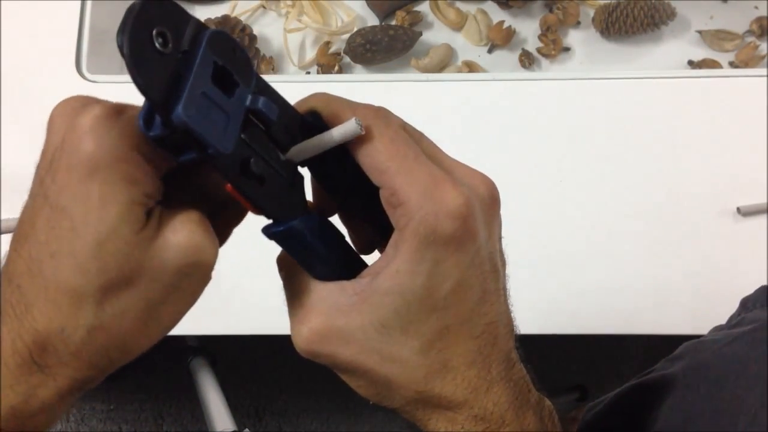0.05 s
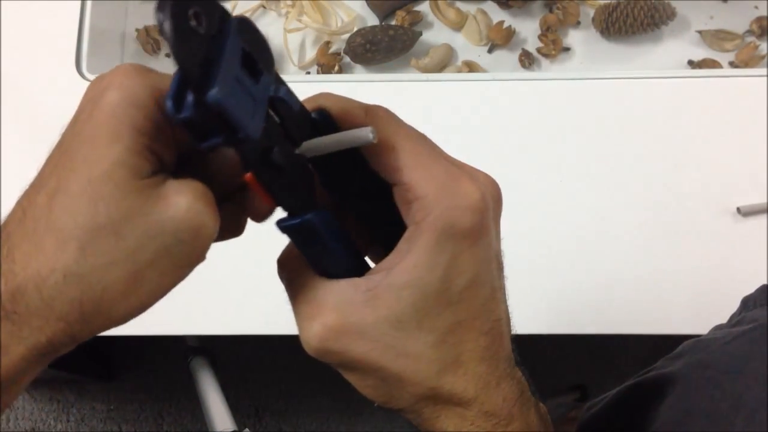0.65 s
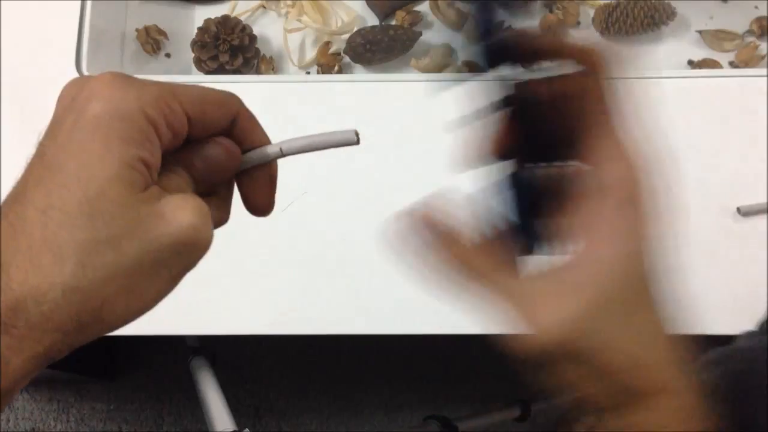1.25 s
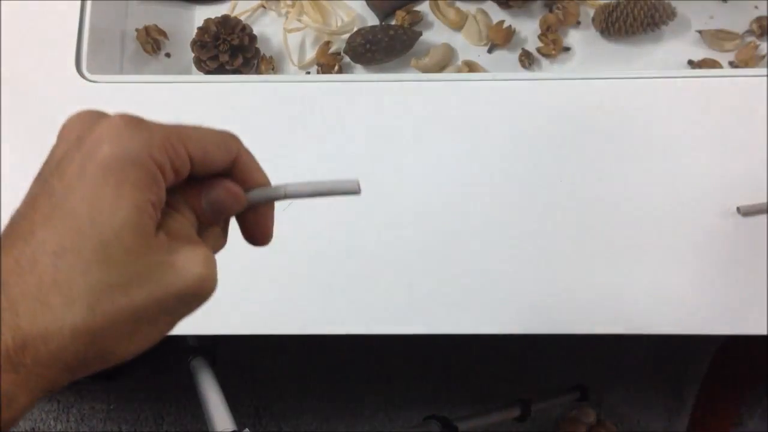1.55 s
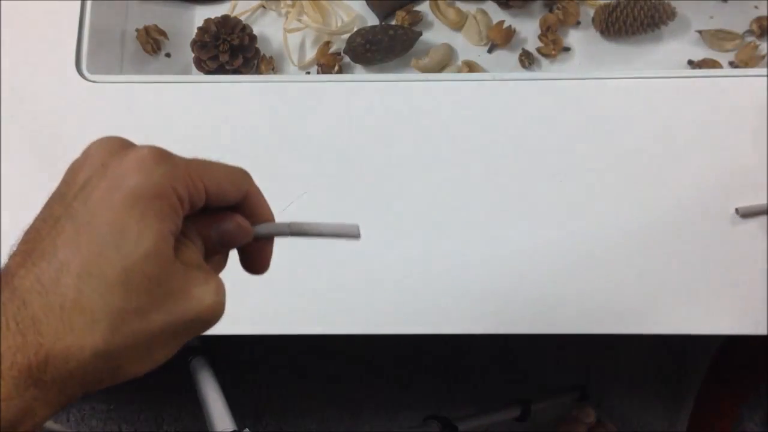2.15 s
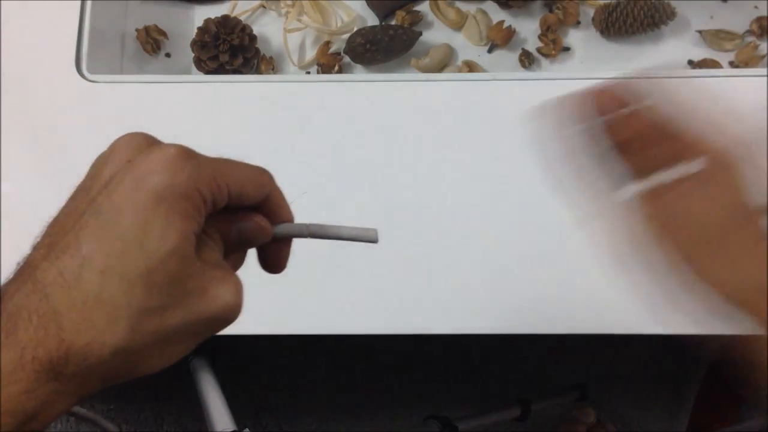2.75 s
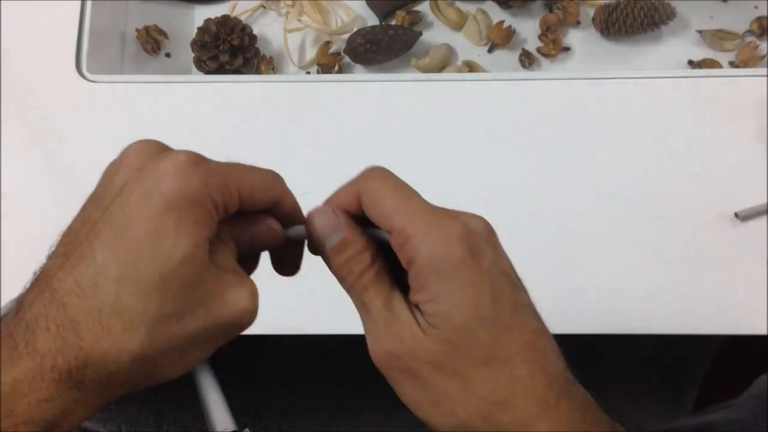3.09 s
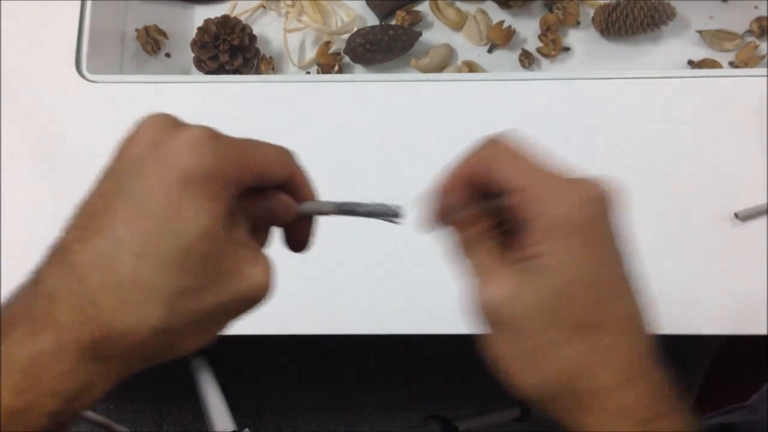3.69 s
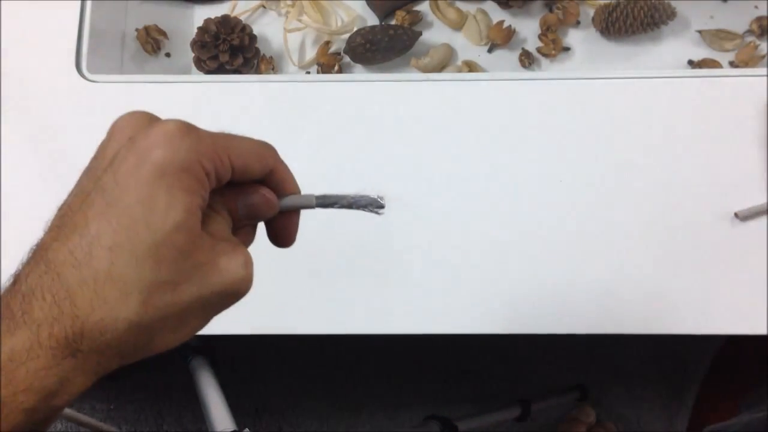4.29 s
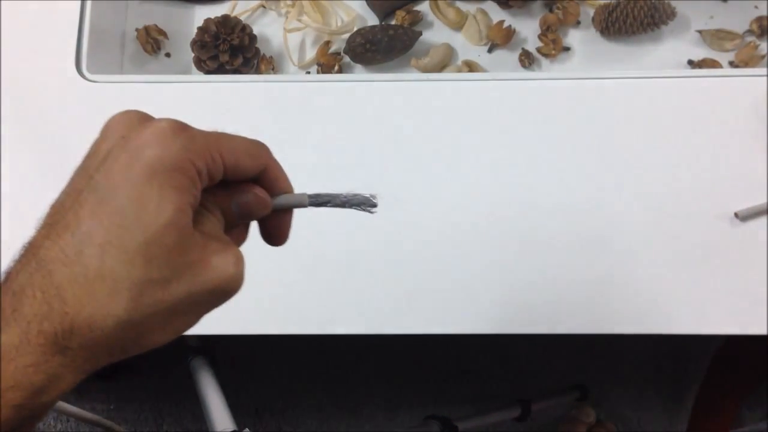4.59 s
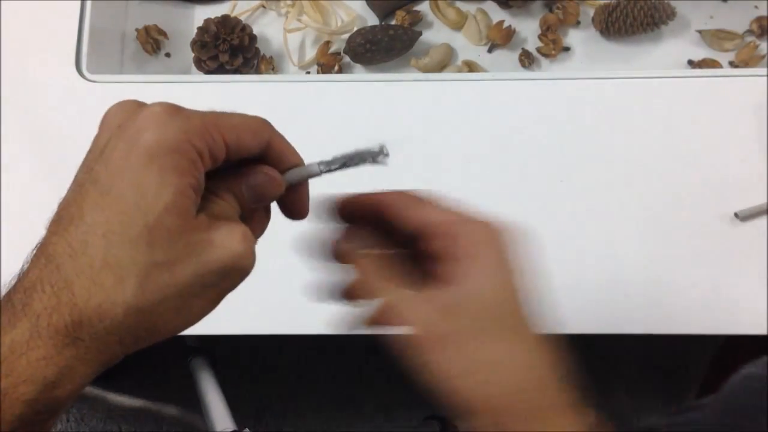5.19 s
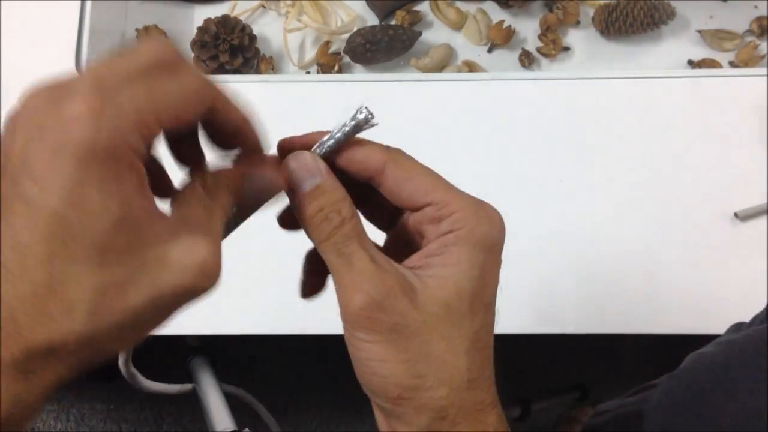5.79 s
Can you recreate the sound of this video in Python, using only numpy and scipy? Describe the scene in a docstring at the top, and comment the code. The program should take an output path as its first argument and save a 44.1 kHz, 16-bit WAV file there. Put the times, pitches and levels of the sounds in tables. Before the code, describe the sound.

Close by in a small, quiet room, a few faint handling bumps lead to a crisp click as a crimping tool nicks a cable. The loudest sound comes next: the tool knocks hard on a desk, then tips and settles with muffled thuds and a little clack. Later come a light plastic tick, the tiny bounce of a dropped piece of cable jacket and a soft tap, over faint hiss and low rumble.

```python
"""A hand crimping tool bumps softly on a desk, nicks a network cable's jacket and snaps free (1.1 s).
It is put down with one hard knock that rings the desk top (1.8 s), then rocks over and settles.
Fingers slide the jacket off with a plastic tick (3.8 s) and drop it (4.9 s); it bounces, soft taps follow.
Throughout, a small quiet room: a sleeve brushing now and then, a far clock, low rumble, hum and hiss."""
import sys
import numpy as np
from scipy import signal
from scipy.fft import rfft, irfft, next_fast_len
from scipy.io import wavfile

SR = 44100
rng = np.random.default_rng(int(sys.argv[2]) if len(sys.argv) > 2 else 0)


def store_pcm(level_fs):
    """Save levels as 16-bit WAV."""
    pcm = np.round(np.clip(level_fs, -1, 1) * 32767).astype(np.int16)
    wavfile.write(sys.argv[1], SR, np.atleast_2d(pcm).T)


N = 266408
T = np.arange(int(SR * .7)) / SR  # time within one event, s


def desk(hard_hz=8500, knock_db_per_oct=5):
    """Each blow knocks at the contact and booms the whole board; a softer contact knocks less."""
    # tool and desk at the contact, short bark then thin ring; the strong short 1044 Hz note is the tool's own
    # ring: f/Hz, level/dB, t60/s, rise/s
    knock_modes = [(387, -11, 0.025, .001), (1044, 6, 0.018, 0.0036), (1530, -14.5, 0.031, 0.00043),
                   (1790, -12, 0.023, 0.00082), (2530, -13.5, 0.014, .0005), (3550, -27, 0.0176, .0003),
                   (4650, -24.5, .011, .0002), (5100, -26.5, 0.013, 0.00016), (564.4, -34.5, .3, .003),
                   (670, -35.5, 0.33, .003), (821, -33, 0.22, 0.0025), (986, -24, 0.21, .003),
                   (1054, -27, 0.17, 0.0042), (1350, -30, 0.3, .003), (1414, -37, .2, 0.0033),
                   (1483, -31, 0.21, .003), (1548, -31.5, .17, .003), (1777, -30.5, 0.097, .003),
                   (2005, -34, .21, .003), (2280, -36.5, 0.12, 0.001), (2540, -33.5, .16, .003)]
    # desk top boom: f/Hz, level/dB, t60/s, rise/s
    board_modes = [(135.1, -27, .33, 0.011), (153.3, -20.5, 0.15, 0.0043), (215.4, -27, .22, 0.0027),
                   (238, -30.5, 0.18, .003), (361, -20.5, 0.28, 0.012), (444, -28, 0.19, 0.0036)]
    # room response to a knock: f/Hz, level/dB
    knock_room = [(100, -22.5), (400, -4.5), (750, -7), (1020, -2), (1280, -5.5), (1600, -5.5),
                  (2500, -11.5), (3200, -20), (4600, -20), (6500, -30.5), (10000, -41), (15000, -49.5)]
    # room response to a thud: f/Hz, level/dB
    thud_room = [(40, -25.5), (90, -12.5), (140, 10.5), (300, -2.5), (430, -2), (600, -12), (1000, -32.5),
                 (3000, -71.5)]
    crack_spectrum = [(500, 1), (2500, 4.5), (5000, -2), (7000, -12.5), (15000, -28.5)]  # f/Hz, level/dB
    out = np.zeros(N)
    for t_s, thud_db, contact_hz in contacts():
        knock_db = thud_db + knock_db_per_oct * np.log2(contact_hz / hard_hz)
        crack = amp(-20.5) * noise(crack_spectrum, len(T)) * fade(0.019, 0.000067)
        knock = ring(knock_modes, scatter_db=1.7) + crack + amp(-25.5) * room(knock_room, build_s=.005)
        thud = ring(board_modes, scatter_db=1.04) + amp(-26) * room(thud_room, build_s=0.0024)
        add(out, t_s, soften(amp(knock_db) * knock + amp(thud_db) * thud, contact_hz))
    return out


def contacts(rock_loss_db=3):
    """A tilted landing rocks onto its other edge, more lightly. Rows: t/s, level/dB, cut-off/Hz."""
    # tool and hands on the desk: t/s, level/dB, contact cut-off/Hz, second edge delay/s (0: lands flat)
    blows = [(0.184, -33.5, 750, 0.021), (0.561, -39, 303, 0), (0.843, -34, 240, 0), (1.812, -1.5, 8460, 0),
             (2.3111, -12, 1346, 0.0415), (2.5214, -18, 600, 0), (2.5316, -11, 1100, 0.0137),
             (2.753, -28, 600, 0)]
    first_edge = [(t_s, db, hz) for t_s, db, hz, _ in blows]
    second_edge = [(t_s + rock_s, db - rock_loss_db, hz) for t_s, db, hz, rock_s in blows if rock_s > 0]
    return first_edge + second_edge


def soften(x, contact_hz):
    """A soft contact lasts longer and cannot drive the high modes."""
    return signal.sosfilt(signal.butter(2, min(contact_hz, SR * .45), fs=SR, output="sos"), x)


def ticks(slip_delay_s=0.0025, slip_hz=4760, slip_t60_s=0.009, low_cut_hz=1500):
    """Blade and jacket snap, then the jacket slips on a fixed note; too small to radiate bass."""
    # close snaps: t/s, ring/dB, f/Hz, t60/s, crack/dB, slip/dB
    snaps = [(0.5801, -38, 9500, 0.0028, -53.5, -62), (1.0829, -13, 3270, 0.0013, -40, -45),
             (3.7522, -32, 4300, 0.0055, -43, -38)]
    out = np.zeros(N)
    for t_s, ring_db, hz, t60_s, crack_db, slip_db in snaps:
        add(out, t_s, snap(ring_db, hz, t60_s, crack_db))
        add(out, t_s + slip_delay_s, snap(slip_db, slip_hz, slip_t60_s, crack_db=slip_db - 3))
    return signal.sosfilt(signal.butter(2, low_cut_hz, "high", fs=SR, output="sos"), out)


def snap(ring_db, hz, t60_s, crack_db):
    """A few cycles of ring and a crack."""
    crack_spectrum = [(800, -20.5), (2300, 6.5), (10000, 2.5), (15000, -0.5)]  # f/Hz, level/dB
    ping = np.sin(2 * np.pi * hz * T) * fade(t60_s, 0.00029)
    crack = noise(crack_spectrum, len(T)) * fade(0.0113, 0.00023)
    return amp(ring_db) * ping + amp(crack_db) * crack


def clacks():
    """Light plastic hits the desk: sharp contact, short-lived modes, then the room."""
    # plastic hits: t/s, level/dB, tilt/(dB/oct)
    hits = [(0.178, -54.5, 1.5), (0.545, -56.5, 1), (0.831, -56, -13), (2.3513, -45.5, 3.5),
            (2.388, -51.5, 0), (2.5212, -29, -1.46)]
    # hard plastic: f/Hz, level/dB, t60/s, rise/s
    plastic_modes = [(1059, -5, 0.037, 0.0017), (1424, -6.5, 0.046, 0.00061), (1570, -6.5, 0.031, 0.0003),
                     (2297, -7.5, 0.052, 0.00056), (2724, -11.5, .035, .0003)]
    # clack noise and its reflections: f/Hz, level/dB
    spectrum = [(200, -15), (600, -9), (1100, 1.5), (1600, -2.5), (2600, -3.5), (3500, -9), (7000, -17.5),
                (15000, -29.5)]
    out = np.zeros(N)
    for t_s, db, tilt_db_per_oct in hits + bounces(count=3):
        contact = amp(-6) * unit(rng.standard_normal(len(T))) * fade(0.0053, .0002)
        body = ring(plastic_modes, scatter_db=1.5) + amp(-5) * noise(spectrum, len(T)) * fade(0.046, .0003)
        tail = amp(-16) * room(spectrum, build_s=0.0064)
        add(out, t_s, amp(db) * brighten(contact + body + tail, tilt_db_per_oct, pivot_hz=1460))
    return out


def bounces(count):
    """The dropped jacket hops ever lower, weaker and duller. Rows: t/s, level/dB, tilt/(dB/oct)."""
    drop_s, drop_db, drop_db_per_oct = 4.856, -32.5, -2.5
    first_flight_s, flight_ratio = 0.096, 0.44
    loss_db, dull_db_per_oct = 13, 7.5  # per bounce
    return [(drop_s + first_flight_s * sum(flight_ratio ** np.arange(k)),
             drop_db - loss_db * k,
             drop_db_per_oct - dull_db_per_oct * k) for k in range(count)]


def brighten(x, tilt_db_per_oct, pivot_hz):
    """A harder contact lifts the treble: a causal spectral tilt."""
    size = 2 * len(x)
    octaves = np.log2(np.hypot(np.fft.rfftfreq(size, 1 / SR) / pivot_hz, 1) / np.sqrt(2))
    cepstrum = irfft(np.log(amp(tilt_db_per_oct * octaves)))
    cepstrum[1:size // 2] *= 2  # fold to minimum phase
    cepstrum[size // 2 + 1:] = 0
    return irfft(rfft(x, size) * np.exp(rfft(cepstrum)))[:len(x)]


def taps():
    """Fingers close on cable and handle: one hollow damped note and a dull puff."""
    # finger and cable taps: t/s, note/dB, f/Hz, t60/s, puff/dB
    touches = [(0.841, -39.5, 185, 0.058, -55), (5.386, -32.5, 456, 0.038, -44.5),
               (5.650, -53, 835, 0.13, -52.5)]
    # f/Hz, level/dB
    puff_spectrum = [(100, -6), (300, 2.5), (500, 5.5), (950, -8.5), (1400, -15.5), (5000, -31)]
    out = np.zeros(N)
    for t_s, note_db, hz, t60_s, puff_db in touches:
        note = np.sin(2 * np.pi * hz * T) * fade(t60_s, 0.0024)
        puff = noise(puff_spectrum, len(T)) * fade(0.085, 0.0008)
        add(out, t_s, amp(note_db) * note + amp(puff_db) * puff)
    return out


def clock():
    """A far clock steps once a second, heard through its reflections."""
    # tick spectrum: f/Hz, level/dB
    spectrum = [(400, -12.5), (1000, -5.5), (2100, 0), (4200, -3), (7000, -10), (14000, -26)]
    out = np.zeros(N)
    for t_s in .355 + np.arange(6):
        add(out, t_s, amp(-55.5 + rng.normal()) * room(spectrum, build_s=0.012))
    return out


def sleeve():
    """Cloth hisses as the arm reaches out and comes back."""
    # arm moves: centre t/s, level/dB, half length/s
    brushes = [(1.53, -63.5, 0.17), (2.806, -65.5, 0.2), (4.42, -68.5, 0.2), (5.08, -63.5, 0.16)]
    # cloth friction: f/Hz, level/dB
    cloth = [(300, -10), (1000, -5), (2200, -0.5), (5000, -1.5), (9000, -7.5), (15000, -16.5)]
    t = np.arange(N) / SR
    speed = sum(amp(db) * np.exp(-((t - centre_s) / half_s) ** 2) for centre_s, db, half_s in brushes)
    return speed * noise(cloth, N)


def room(spectrum, build_s):
    """Diffuse reflections build up, then die sooner in the treble."""
    # room decay: f/Hz, t60/s
    decay = [(100, 0.2), (400, 0.58), (1000, .42), (2200, 0.36), (4500, .24), (10000, .14)]
    hz, t, bands = signal.stft(noise(spectrum, len(T)), SR, nperseg=256)
    damping = np.exp(-np.log(1000) * t / along(decay, hz)[:, None])
    tail = signal.istft(bands * damping, SR)[1][:len(T)]
    return tail * (1 - np.exp(-(T / build_s) ** 2))


def background():
    """The room's low rumble and wavering hum under an even hiss."""
    # room rumble: f/Hz, level/dB
    rumble = [(20, -22), (45, -10), (60, -4.5), (69, 2), (80, -5), (100, -4), (135, -13), (200, -27),
              (400, -55.5)]
    # hum, a narrow noise band: f/Hz, level/dB
    hum = [(55, -40), (66, -6.5), (69, 1.5), (72, -7.5), (84, -46.5)]
    # drift of rumble and hum: t/s, level/dB
    drift = [(0.0, -61), (0.39, -61), (0.67, -72.5), (1.48, -66.5), (1.6, -71), (2.93, -65), (4.66, -63),
             (5.35, -66), (5.43, -71), (6.04, -74)]
    # microphone hiss: f/Hz, level/dB
    hiss = [(88, -29), (150, -2), (178, -4), (307, -1.5), (365, -2), (517, -3.5), (790, -7.5), (871, -8),
            (1360, -10.5), (3370, -9.5), (15200, -12)]
    low_db = np.interp(np.arange(N) / SR, *np.transpose(drift))
    low = amp(-0.65) * noise(rumble, N) + amp(-1.0) * noise(hum, N)
    return amp(low_db) * low + amp(-64.5) * noise(hiss, N)


def ring(modes, scatter_db):
    """Damped modes, each at a slightly new strength."""
    return sum(amp(db + scatter_db * rng.normal()) * np.sin(2 * np.pi * hz * T) * fade(t60_s, rise_s)
               for hz, db, t60_s, rise_s in modes)


def fade(t60_s, rise_s):
    """Quick swell, then 60 dB of decay per t60_s."""
    return np.exp(-np.log(1000) * T / t60_s) * (1 - np.exp(-T / rise_s))


def noise(spectrum, size):
    """Coloured noise of rms 1."""
    hz = np.fft.rfftfreq(size, 1 / SR)
    return unit(irfft(rfft(rng.standard_normal(size)) * amp(along(spectrum, hz)), size))


def along(points, hz):
    """Interpolate (f/Hz, value) points on a log axis."""
    points_hz, values = np.transpose(points)
    return np.interp(np.log(hz + 1), np.log(points_hz), values)


def amp(db):
    """Decibels to gain."""
    return 10 ** (np.asarray(db) / 20)


def unit(x):
    """Scale to rms 1."""
    return x / np.sqrt(np.mean(x ** 2) + 1e-20)


def add(track, t_s, sound):
    """Mix a sound into the track at t_s."""
    start = round(t_s * SR)
    track[start:start + len(sound)] += sound[:len(track) - start]


def scene():
    """All sources, summed to mono."""
    return (desk() + clacks() + ticks() + taps() + clock() + sleeve() + background())[None]


def record(dry):
    """Brick-wall low-pass."""
    top_hz = 15350
    size = next_fast_len(N + SR // 2)
    passband = np.fft.rfftfreq(size, 1 / SR) < top_hz
    return irfft(rfft(dry, size) * passband, size)[..., :N]


dry = scene()
out = record(dry)
store_pcm(out)
```